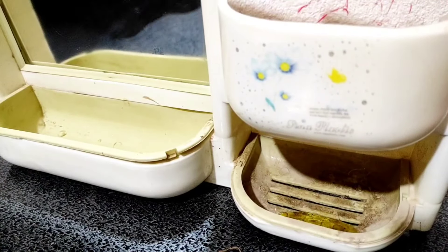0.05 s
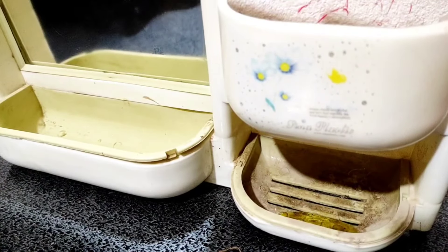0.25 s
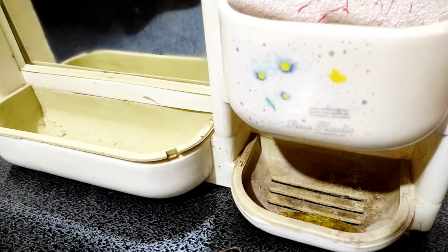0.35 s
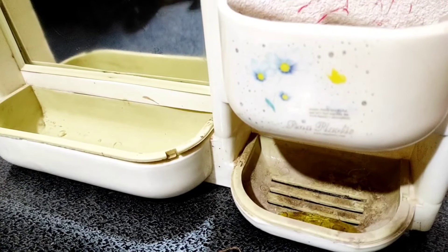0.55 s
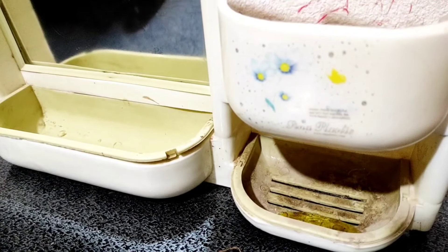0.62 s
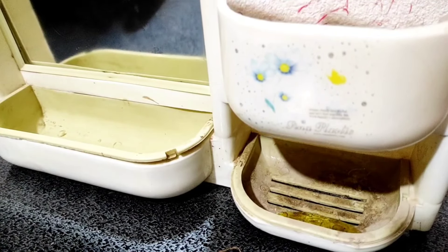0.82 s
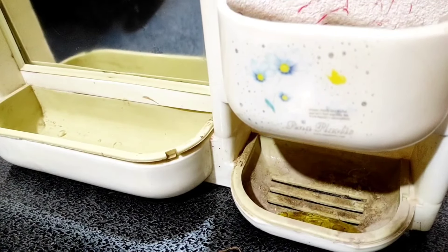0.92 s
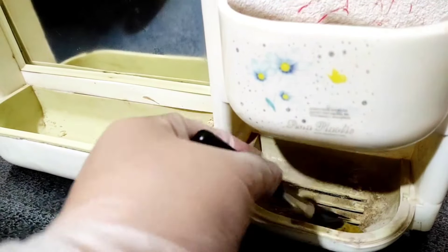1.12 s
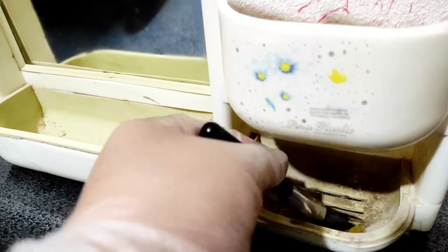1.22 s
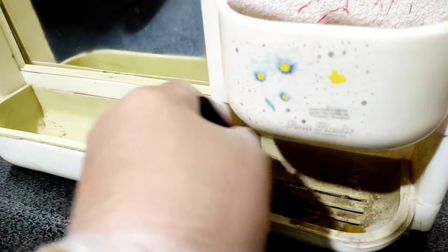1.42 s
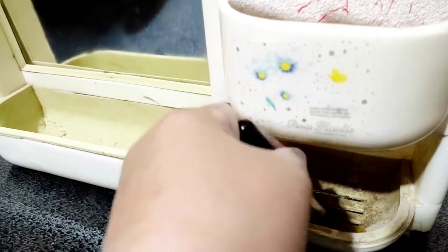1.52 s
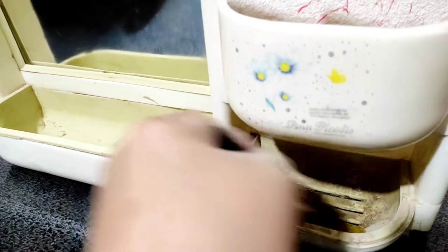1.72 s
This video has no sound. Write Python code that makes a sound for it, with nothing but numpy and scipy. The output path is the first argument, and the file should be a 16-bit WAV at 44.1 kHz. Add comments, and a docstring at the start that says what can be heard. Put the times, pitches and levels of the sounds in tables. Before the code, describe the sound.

A hollow plastic thump, then faint rubbing and a small brush scrubbing a tray.

```python
"""A small, quiet room, with a stereo microphone close to a hollow plastic cabinet.
At 0.2 s the cabinet is bumped and its walls ring. From 0.4 s something judders against it in slow slips,
with thin squeaks and faint grazes. Just after 1.1 s a hand brings a small brush to the dirty tray:
a sleeve rustles and the bristles touch lightly. From 1.4 s they scrub in short strokes.
The hush of the room lies behind it all."""
import sys
import numpy as np
from scipy import signal
from scipy.fft import rfft, irfft, next_fast_len
from scipy.io import wavfile

SR = 44100
rng = np.random.default_rng(int(sys.argv[2]) if len(sys.argv) > 2 else 0)


def master(y):
    """Save y as 16-bit WAV."""
    cut = np.clip(np.atleast_2d(y).T, -1, 1)
    pcm = np.round(cut * 32767)  # scale
    wavfile.write(sys.argv[1], SR, pcm.astype(np.int16))


N = 77175  # 1.75 s

# modes of the cabinet walls: pitch_hz, level_db, t60_s, left_over_right_db
WALL_MODES = [(140, -22.5, .3, 3), (163.1, -8.5, .24, -5), (212, -7, 0.27, -0.5), (280.9, -0.5, 0.26, 2),
              (310.6, -26.5, .16, -3), (307, -6.5, 0.17, -8), (399, -5.5, 0.16, -1), (431.4, -5, 0.11, 2),
              (519.5, -3, .04, 7.5), (727, -23.5, 0.071, 18.5), (867, -17.5, 0.063, -6.5),
              (973, -26.5, 0.092, 4), (1418, -21.5, 0.046, -4), (1518, -16.5, 0.084, 3.5)]
LEFT_LAG_S = 0.00017  # the cabinet's sound reaches the left microphone later

def cabinet(contacts):
    """Each contact rings the walls, whose modes swing in alternate directions; long ones are duller."""
    t = since(0)
    ring = sum((-1) ** k * pan(side) * amp(db) * fade(t, t60) * np.cos(2 * np.pi * hz * t)
               for k, (hz, db, t60, side) in enumerate(WALL_MODES))
    force = np.zeros(N)
    for start, db, contact, _ in contacts:
        push = since(start) * np.exp(-2 * np.pi * since(start) / contact)
        force += amp(db) * push / push.sum()
    sound = -signal.fftconvolve(radiated(ring), force[None], axes=1)[:, :N]
    return filtered(sound, lambda hz: np.exp(1j * np.pi * hz * LEFT_LAG_S * np.array([[-1], [1]])))


# the bump and its rebounds: start_s, ring_db, contact_s, crack_db
BUMPS = [(0.2141, -8, 0.00061, -23), (0.2434, -23, 0.00061, -64.5), (0.2585, -22.5, .0025, -55.5)]
# spectrum of the plastic's crack: frequency_hz, level_db
CRACK_SPECTRUM = [(30, -9.5), (100, 9), (300, 4), (650, 5), (1200, 3), (1600, -5.5), (2000, -5),
                  (3000, -11.5), (4000, -4.5), (5400, -20), (6800, -11.5), (8500, -33.5), (15000, -39)]

def bump():
    """A knock close to the microphone: a hollow thump with a short plastic crack."""
    crack = sum(amp(db) * burst(start, attack=0.00017, t60=0.046) for start, _, _, db in BUMPS)
    return cabinet(BUMPS) + pan(-1) * crack * noise(CRACK_SPECTRUM)


# slips against the cabinet: start_s, ring_db, contact_s, thud_db
SLIPS = [(.4245, -39.5, 0.0021, -41), (0.441, -47, 0.0015, -37), (0.4629, -34, 0.0038, -51),
         (0.4771, -34.5, 0.0023, -31.5), (.496, -45.5, 0.0015, -42), (.5140, -39, 0.0025, -31),
         (0.5291, -36.5, 0.0011, -42), (0.5472, -32.5, 0.0017, -30.5), (0.5613, -44, 0.0015, -40.5),
         (0.5804, -39, 0.0024, -34), (0.6, -37, 0.0016, -56), (0.6138, -48, .0015, -45),
         (0.6197, -45, 0.002, -52), (0.629, -42, 0.0013, -54), (0.6401, -40.5, 0.003, -46),
         (0.6545, -33.5, 0.002, -53), (0.6627, -43, 0.0024, -43.5), (0.6699, -41.5, 0.0012, -47)]
# the dead knock of a slip: pitch_hz, level_db, t60_s
THUD_MODES = [(208, -1, 0.016), (460, -4, 0.013), (760, -12.5, .01)]
# spectrum of grit and rubbing: frequency_hz, level_db
GRIT_SPECTRUM = [(60, -25.5), (130, -12.5), (220, 6), (500, -2.5), (620, -1), (790, -2), (950, -14),
                 (1250, -11.5), (1800, -21.5), (4000, -27), (12000, -44)]
THUD_LAG_S, GRIT_DB = 0.0019, -11.5  # after the slip; grit relative to the thud
THUD_SOFT_HZ = 970  # the soft contact gives little above this

def judder():
    """Uneven slips ring the cabinet, each with a thud and a puff of grit, over rubbing that dies away."""
    thuds, grit = np.zeros(N), np.zeros(N)
    for start, _, _, db in SLIPS:
        t = since(start + THUD_LAG_S)
        thuds += amp(db) * sum(amp(level) * fade(t, t60) * np.sin(2 * np.pi * hz * t)
                               for hz, level, t60 in THUD_MODES)
        grit += amp(db + GRIT_DB) * burst(start + THUD_LAG_S, attack=0.0017, t60=0.061)
    thuds = signal.sosfilt(signal.butter(5, THUD_SOFT_HZ, fs=SR, output='sos'), thuds)
    rub = amp(-58) * swell(0.362, 0.042, 0.17, 0.13)
    settle = amp(-61.5) * swell(0.69, 0.071, 0.063, 0.065) * noise(RUSTLE_SPECTRUM)
    friction = (grit + rub) * noise(GRIT_SPECTRUM)
    return cabinet(SLIPS) + pan(1) * (radiated(thuds) + friction) + settle


# brush strokes: start_s, attack_s, hold_s, release_s, scrape_db, hiss_db
STROKES = [(1.395, 0.0084, 0.033, 0.065, -47.5, -51.5), (1.439, 0.021, 0.021, 0.013, -66, -55),
           (1.501, 0.025, 0.062, .04, -53.5, -58.5), (1.538, 0.022, 0.031, 0.052, -51.5, -49),
           (1.577, 0.022, 0.011, 0.028, -44, -51.5), (1.616, 0.026, 0.039, 0.14, -48, -55),
           (1.69, 0.027, .04, .05, -55, -50.5)]
# spectra of the scrape on the tray and of the bristles' hiss: frequency_hz, level_db
SCRAPE_SPECTRUM = [(30, -14), (80, -18), (150, -11), (330, -3), (580, 1), (660, -11), (780, 2), (950, -1.5),
                   (1150, -1), (1450, -2), (1750, 3), (2100, -3.5), (2400, -11.5), (3200, -9), (4500, -29)]
HISS_SPECTRUM = [(1410, -40), (2400, -8), (2620, 4), (2830, -37), (3080, -7.5), (4620, 0), (5620, -3.5),
                 (6670, 4), (8300, -12.5), (9050, -11), (11100, -15), (13800, -14), (15500, -22)]
# tray resonances: start_s, attack_s, hold_s, release_s, pitch_hz, width_hz, level_db
TRAY_RESONANCES = [(1.5, 0.036, 0.059, 0.11, 436, 22, -50), (1.4, .03, 0.024, 0.056, 436, 44, -60),
                   (1.7, 0.0097, 0.01, 0.018, 1000, 500, -63), (1.4, 0.024, .04, .04, 1720, 60, -56.5),
                   (1.9, .03, 0.029, .03, 1830, 60, -52), (1.65, 0.025, 0.021, 0.026, 1925, 65, -51.5),
                   (1.4, 0.022, 0.065, 0.037, 7500, 130, -71)]

def scrubbing():
    """Bristles scrape and hiss over the tray, near the stereo centre, and wake its resonances."""
    scrape = sum((amp(db) * swell(*timing)) ** 2 for *timing, db, _ in STROKES) ** .5
    hiss = sum((amp(db) * swell(*timing)) ** 2 for *timing, _, db in STROKES) ** .5
    out = pan(-0.69) * scrape * bristles(SCRAPE_SPECTRUM, spread_db=3)
    out += pan(-0.41) * hiss * bristles(HISS_SPECTRUM, spread_db=0.5)
    for *timing, centre, width, db in TRAY_RESONANCES:
        tone = filtered(rng.standard_normal((2, N)), lambda hz: 1 / (1 + (2 * (hz - centre) / width) ** 2))
        out += amp(db) * swell(*timing) * coloured(radiated(tone), [(centre, 0)])
    return out


def bristles(spectrum, spread_db, catches_per_s=5000):
    """Bristles catch and let go in dense tiny snaps, each of its own size."""
    caught = rng.random((2, N)) < catches_per_s / SR
    snaps = caught * rng.choice([-1, 1], (2, N)) * amp(spread_db * rng.standard_normal((2, N)))
    return coloured(snaps, spectrum)


# light brushing touches: start_s, level_db, attack_s, t60_s
TOUCHES = [(0.299, -62, 0.047, 1), (0.54, -52, 0.0014, 0.096), (.6, -57, 0.034, 0.68),
           (1.07, -60.5, 0.0017, 0.44), (1.167, -44, 0.0013, 0.033), (1.178, -51, 0.0048, 0.17)]
# spectra of a graze and of a sleeve's soft rubbing: frequency_hz, level_db
GRAZE_SPECTRUM = [(500, -6), (2000, -5.5), (3000, -10), (4300, 0.5), (5600, -2), (6700, 2), (8300, -13),
                  (12000, -19), (15500, -10)]
RUSTLE_SPECTRUM = [(60, -24), (130, -10.5), (280, 5), (500, -5), (1000, -9.5), (1800, -15), (4000, -14.5),
                   (12000, -26.5)]

def touches():
    """Faint hissy grazes to the right of the microphone, and the rustle of the arm reaching in."""
    level = sum(amp(db) * burst(start, attack, t60) for start, db, attack, t60 in TOUCHES)
    grazes = pan(-4) * level * bristles(GRAZE_SPECTRUM, spread_db=6)
    sleeve = amp(-61) * swell(1.142, 0.2, 0.33, 0.23) * noise(RUSTLE_SPECTRUM)
    return grazes + sleeve


# thin squeaks of the plastic: start_s, hold_s, pitch_hz, level_db
SQUEAKS = [(.542, 0.026, 4480, -56.5), (.567, 0.031, 6750, -62), (.623, 0.0095, 6300, -65)]
SAG_HZ_PER_S, ROUGHNESS_HZ = 17000, 600

def squeaks():
    """Sliding plastic gives faint, rough whistles that sag in pitch, right of centre."""
    out = np.zeros((2, N))
    for start, hold, hz, db in SQUEAKS:
        t = since(start)
        rough = unit(filtered(rng.standard_normal((2, N)), lambda f: np.exp(-(f / ROUGHNESS_HZ) ** 2)))
        whistle = np.sin(2 * np.pi * (hz - SAG_HZ_PER_S * t / 2) * t)
        out += amp(db) * swell(start, 0.0017, hold, .01) * rough * whistle
    return pan(-4) * out


# decay of the small room: frequency_hz, t60_s
ROOM_DECAY = [(150, 0.32), (500, 0.23), (2000, 0.18), (7000, 0.18), (14000, 0.28)]

def room(x):
    """The room returns a short tail to the microphone; each frequency dies at its own speed."""
    hz, t, spectra = signal.stft(rng.standard_normal((2, SR // 2)), SR, nperseg=256)
    tail = signal.istft(spectra * fade(t, along(ROOM_DECAY, hz)[:, None]), SR, nperseg=256)[1]
    tail *= np.minimum(np.arange(tail.shape[1]) / SR / 0.015, 1)  # reflections build over 15 ms
    wet = signal.fftconvolve(x, tail / np.linalg.norm(tail[0]), axes=1)[:, :N]
    colour = [(90, -3), (160, -19), (300, -23), (700, -8), (5000, -12)]  # frequency_hz, gain_db
    return filtered(wet, lambda hz: amp(along(colour, hz)))


# spectrum of the quiet room's air: frequency_hz, level_db
AIR_SPECTRUM = [(20, -37.5), (45, -27), (70, -9.5), (110, -3), (160, -5.5), (280, -6), (420, -8.5),
                (570, -14), (740, -15), (1020, -20), (1400, -19), (2500, -25.5), (4500, -27), (7000, -28.5),
                (8300, -35), (11000, -38.5), (12500, -29), (15500, -36.5)]

def room_tone():
    """A low, steady hush behind the close sounds."""
    return pan(-1) * amp(-59) * noise(AIR_SPECTRUM)


# likeness of the left and right microphone signals: frequency_hz, correlation
STEREO_LIKENESS = [(30, 0.96), (130, 0.0029), (300, 0.64), (600, 0.2), (1200, 0.086), (12000, 0.034)]

def coloured(pair, spectrum):
    """Two unrelated signals made into a stereo sound of rms 1 with this spectrum."""
    def response(hz):
        turn = np.arccos(np.clip(along(STEREO_LIKENESS, hz), -1, 1)) / 2
        return amp(along(spectrum, hz)) * [np.cos(turn), np.sin(turn)]
    mid, side = filtered(pair, response)
    return unit(np.array([mid + side, mid - side]))


def noise(spectrum):
    return coloured(rng.standard_normal((2, N)), spectrum)


def radiated(x, cutoff_hz=116):
    """Small walls give off no deep bass."""
    return signal.sosfilt(signal.butter(4, cutoff_hz, 'high', fs=SR, output='sos'), x)


def filtered(x, response):
    """x times a response of frequency."""
    size = next_fast_len(N + SR // 2)
    return irfft(rfft(x, size) * response(np.fft.rfftfreq(size, 1 / SR)), size)[..., :N]


def amp(db):
    return 10 ** (np.asarray(db) / 20)


def unit(x):
    return x / np.sqrt(np.mean(x ** 2) + 1e-20)


def pan(db):
    """Left and right gains, the left louder by db."""
    return amp(np.array([[db], [-db]]) / 2)


def along(points, hz):
    """A curve through (frequency_hz, value) points on a log axis."""
    frequencies, values = np.transpose(points)
    return np.interp(np.log(hz + 1), np.log(frequencies + 1), values)


def since(start):
    """Seconds since start, zero before."""
    return np.maximum(np.arange(N) / SR - start, 0)


def fade(t, t60):
    return np.exp(-np.log(1000) * t / t60)


def burst(start, attack, t60):
    """A quick rise and an exponential fall."""
    return (1 - np.exp(-since(start) / attack)) * fade(since(start), t60)


def swell(start, attack, hold, release):
    """Attack, hold and a smooth release, in seconds."""
    return np.minimum(since(start) / attack, 1) * np.exp(-2 * since(start + attack + hold) / release)


def scene():
    """Cabinet and brush close up, the room behind."""
    close = bump() + judder() + squeaks() + touches() + scrubbing()
    return close + room(close) + room_tone()


def record(dry, top_hz=15500):
    """The microphone's signal is cut off steeply above top_hz."""
    return filtered(dry, lambda hz: 1 / (1 + (hz / top_hz) ** 300))


dry = scene()
out = record(dry)
master(out)
```